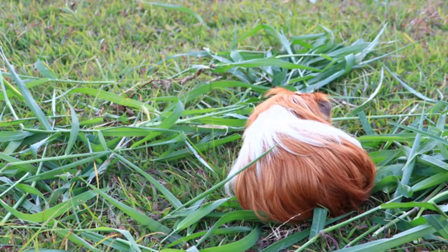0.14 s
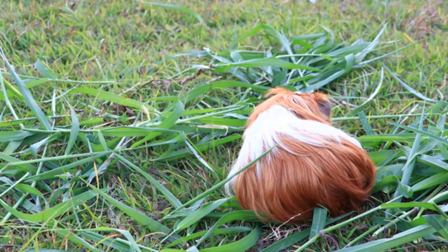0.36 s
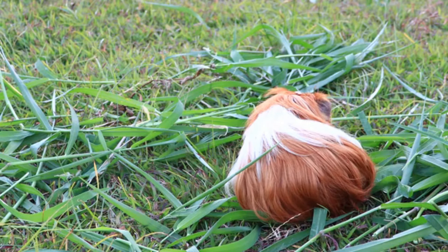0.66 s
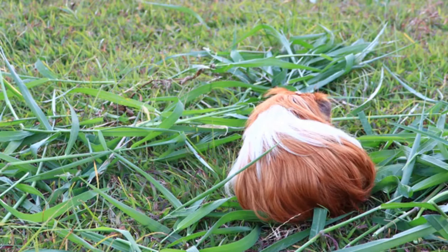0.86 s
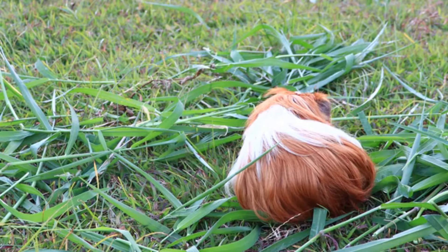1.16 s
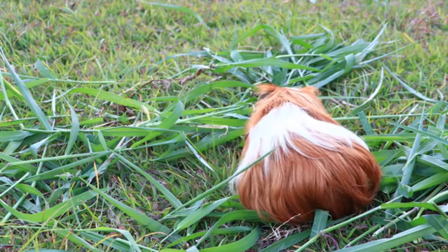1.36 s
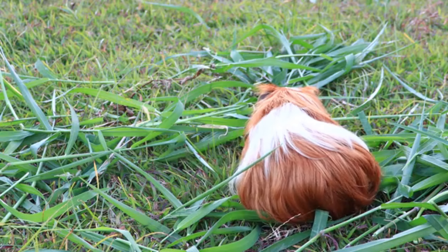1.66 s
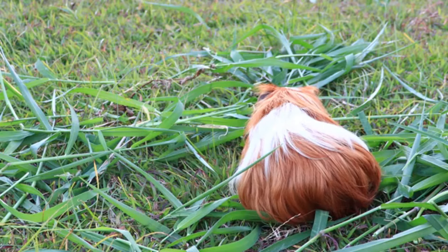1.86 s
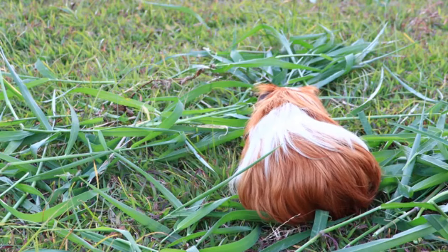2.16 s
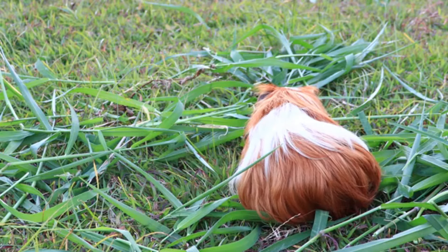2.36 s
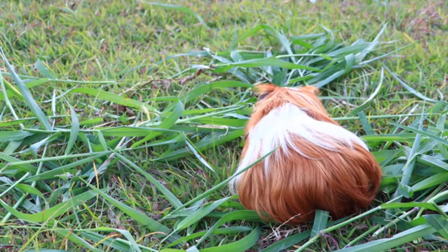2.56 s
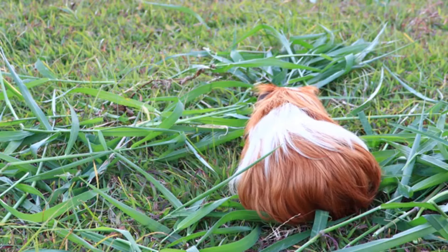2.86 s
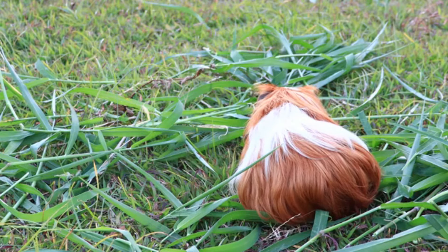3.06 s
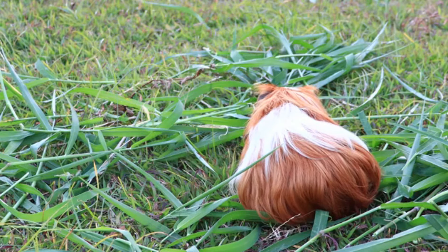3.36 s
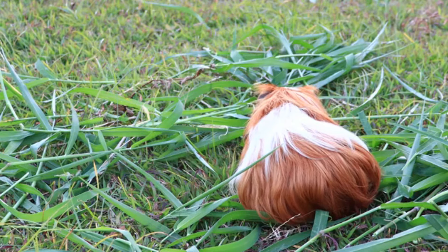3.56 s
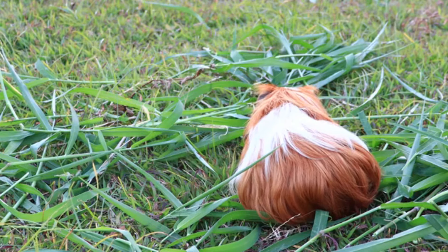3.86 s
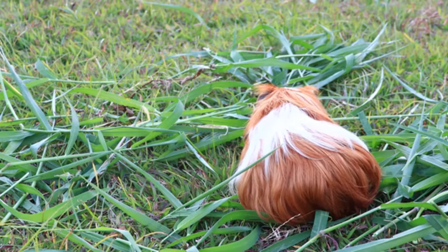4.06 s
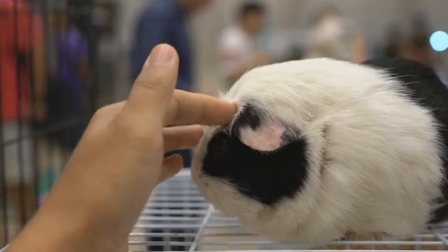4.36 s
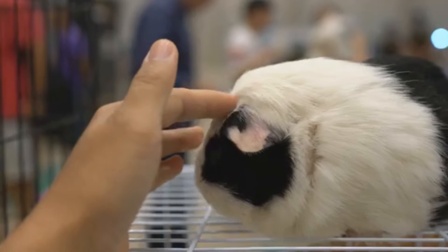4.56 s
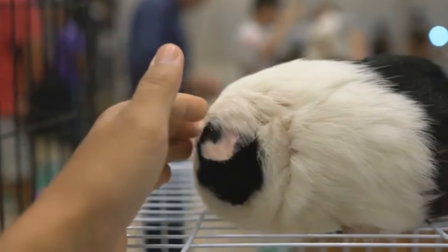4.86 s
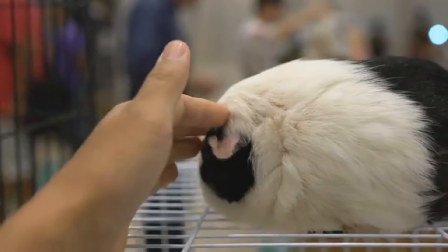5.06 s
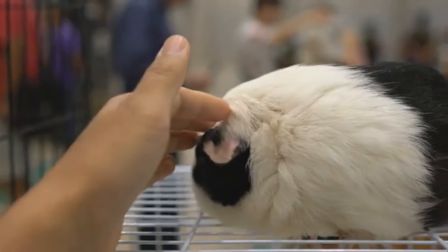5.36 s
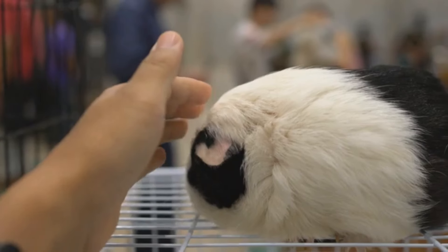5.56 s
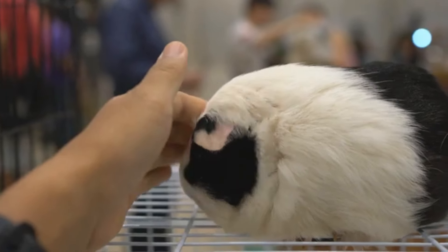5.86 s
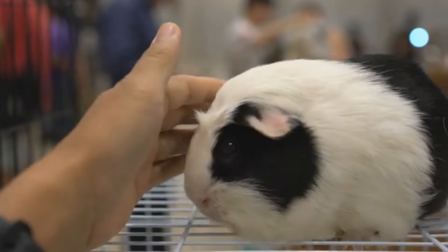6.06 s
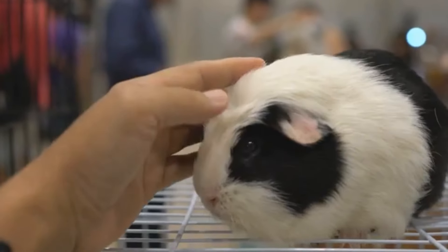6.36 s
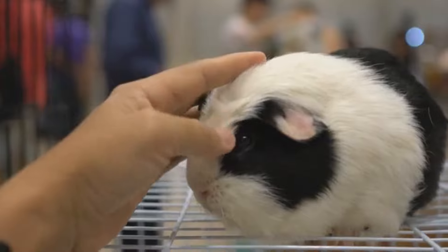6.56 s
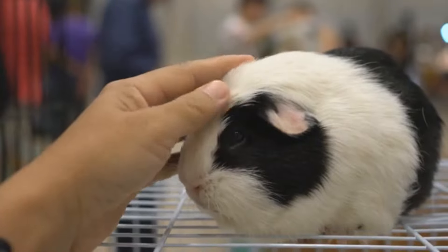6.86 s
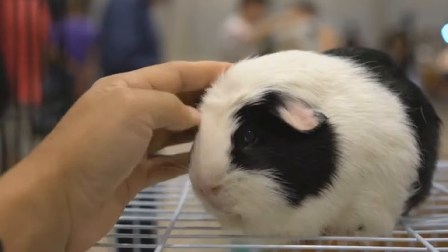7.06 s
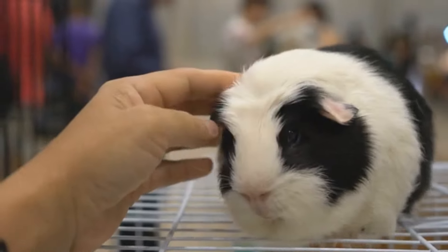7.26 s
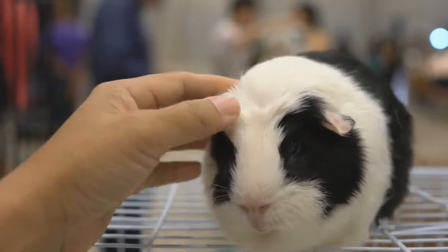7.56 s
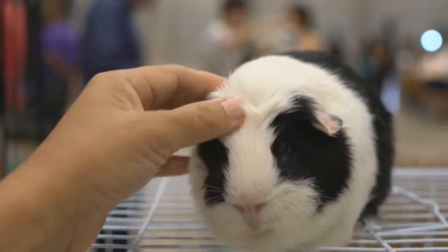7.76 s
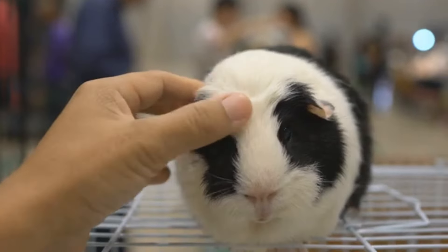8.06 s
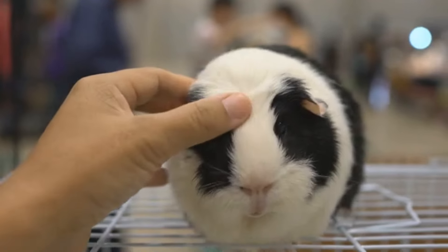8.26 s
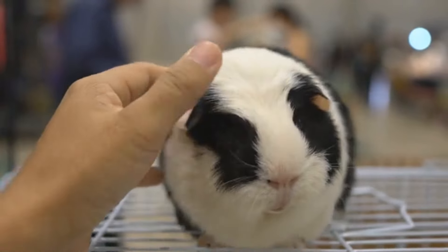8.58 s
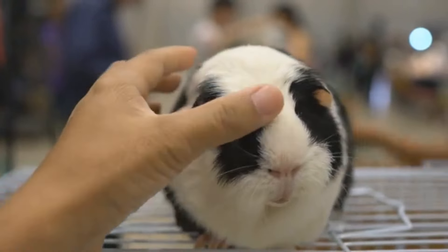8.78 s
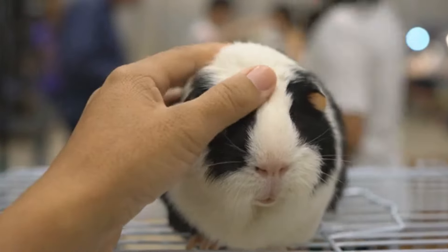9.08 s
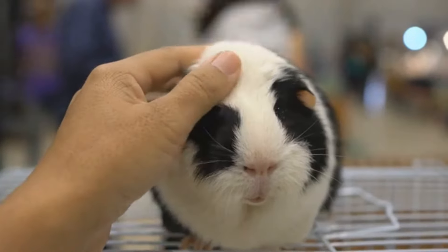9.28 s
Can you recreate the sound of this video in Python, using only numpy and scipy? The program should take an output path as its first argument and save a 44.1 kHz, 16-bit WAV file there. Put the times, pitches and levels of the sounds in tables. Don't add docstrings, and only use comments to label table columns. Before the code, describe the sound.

Piercing upward guinea pig wheeks, some overlapping and overloading, give way to soft coos, swooping whoops and dull little chirps over faint hiss.

```python
import sys
import numpy as np
from scipy import signal
from scipy.fft import rfft, irfft, next_fast_len
from scipy.io import wavfile
from scipy.ndimage import uniform_filter1d, minimum_filter1d, map_coordinates

SR = 44100
rng = np.random.default_rng(int(sys.argv[2]) if len(sys.argv) > 2 else 0)


def amplitude_ratio(level_db):
    exponent = np.asarray(level_db, float) / 20
    return 10 ** exponent


def store_pcm(level_fs):
    pcm = np.round(np.clip(level_fs, -1, 1) * 32767).astype(np.int16)
    wavfile.write(sys.argv[1], SR, np.atleast_2d(pcm).T)


N = 415422
TIME = np.arange(N) / SR

# pitch in Hz, then harmonics 1, 2 and 3 over the level in dB.
CALM = [(500, -5, -10, -13.5), (1000, -2.5, -4, -29.5), (1300, -3.5, -14, -8), (1800, 2.5, -31, -34.5),
        (2300, 3.5, -23, -40)]


def animal(calls, folds, tilt_db=9, jitter=0.011, shimmer_db=1.6056, air_db=-41):
    # frequency in Hz, density in dB per Hz.
    leak = [(600, -36), (1250, -16.5), (2400, -2.5), (3500, -6.5), (4200, 6), (4900, -11.5), (6800, -19.5),
            (8800, -5), (10000, -12.5)]
    sharpen = [0, 0.14, 0.7]
    voice, effort = np.zeros(N), np.zeros(N)
    order = np.arange(1, 14)[:, None]
    near = np.minimum(order, 3)
    for rows in map(np.array, calls):
        start, stop = int(rows[0, 0] * SR) + 1, min(int(rows[-1, 0] * SR), N)
        t = TIME[start:stop]
        push = rows[:, 2] - mouth_db(rows[:, 1])
        path = np.c_[rows[:, 0], np.log2(rows[:, 1]), push]
        octaves, push_db = (uniform_filter1d(c, size=300, mode="nearest") for c in curves(path, t))
        pitch = 2 ** octaves
        taut = np.clip((pitch - 600) / 800, 0, 1) * (push_db + 24.0)
        source_db = np.array([push_db + along(np.array(folds)[:, [0, k]], pitch) + sharpen[k - 1] * taut
                              for k in (1, 2, 3)])
        sag = (pitch[-1] > 3200) * np.clip(1 - (t[-1] - t) / 0.03, 0, 1) ** 2.2
        pitch = pitch * (1 - 0.11 * sag)
        slack = np.clip(900 / pitch, 0, 2)
        unsteady = 1 + jitter * wobble(250, len(t)) * (slack + 0.27)
        phase = 2 * np.pi * np.cumsum(pitch * unsteady) / SR
        edge = np.clip(np.minimum((t - t[0]) / 0.01, (t[-1] - t) / 0.007), 0, 1) ** 2

        level_db = source_db[near[:, 0] - 1] + mouth_db(order * pitch)
        level_db = level_db - (tilt_db + 9 * slack) * np.log2(order / near)
        level_db = level_db - 22 * sag * (near - 1)
        flutter = np.array([wobble(140, len(t)) for _ in order]) * np.minimum(order, 3.5)
        patches = np.array([wobble(30, len(t)) for _ in order])
        level_db = level_db + shimmer_db * flutter + (near - 1) * (slack < 0.7) * patches
        level = amplitude_ratio(level_db) * (order * pitch < SR / 3)
        partials = level * np.sin(order * phase + rng.uniform(0, 2 * np.pi, order.shape))
        voice[start:stop] += np.sqrt(2) * edge * partials.sum(0)
        effort[start:stop] += edge * np.sqrt(np.linalg.norm(level, axis=0)) * slack
    return voice + amplitude_ratio(air_db) * uniform_filter1d(effort, size=1300) * rush(leak, side_db=-99)[0]


def mouth_db(hz):
    # centre in Hz, width in Hz, gain in dB.
    resonances = [(1231, 180, 13.5), (2650, 1200, 6.5), (4260, 420, 0.5), (6590, 1500, 9.5),
                  (8300, 1300, -10.5), (10000, 2000, -8.5)]
    notch = 1 - 0.47 * np.exp(-((hz - 5020) / 240) ** 2)
    power = 0.026 + sum(amplitude_ratio(2 * db) / (1 + (2 * (hz - c) / w) ** 2) for c, w, db in resonances)
    return 10 * np.log10(power) + 20 * np.log10(notch + 1e-3)


def wheeks():
    # time in seconds, pitch in Hz, level in dB.
    long_calls = [
        [(0.34, 634.5, -61), (0.385, 946, -59), (0.402, 1400, -43), (0.424, 1767, -35), (0.478, 2260, -21),
         (0.492, 2360, -15.5), (0.54, 2818, -24), (0.592, 3285, -26.5), (0.686, 4100, -35.5),
         (0.735, 4390, -35.5)],
        [(0.633, 1214, -84), (0.695, 1796, -43), (0.765, 2155, -24.5), (0.8, 2474, -31.5), (0.845, 3080, -30.5),
         (0.929, 3462, -35.5), (0.97, 3390, -41.5)],
        [(1.192, 598, -51), (1.21, 800, -49), (1.223, 917, -48), (1.236, 1180, -32), (1.25, 1427, -28.5),
         (1.306, 1923, -14.5), (1.375, 2420, -16.5), (1.43, 3086, -22.5), (1.502, 3452, -26), (1.55, 3430, -30)],
        [(1.38, 636, -70.5), (1.468, 1523, -64), (1.548, 2390, -22), (1.588, 2616, -25), (1.626, 3160, -30),
         (1.712, 4025, -35.5), (1.762, 4260, -31)],
        [(3.584, 616, -48), (3.598, 800, -31), (3.612, 946, -36), (3.628, 1283, -19.5), (3.64, 1445, -20),
         (3.668, 1700, -16.5), (3.765, 2386, -13), (3.778, 2674, -14.5), (3.815, 3187, -22.5),
         (3.88, 3533, -27.5), (3.922, 3516, -31)],
    ]
    short_calls = [
        [(0.105, 592, -46), (0.135, 900, -42), (0.163, 1277, -30), (0.21, 1560, -29), (0.25, 1750, -18.5),
         (0.285, 1973, -16.5), (0.32, 2300, -16.5), (0.33, 2400, -24.5), (0.359, 2704, -33.5),
         (0.377, 2816, -24.5)],
        [(4.152, 618, -48.5), (4.18, 900, -47), (4.19, 1076, -42), (4.201, 1287, -29), (4.235, 1697, -22.5),
         (4.289, 2100, -14.5), (4.35, 2400, -22), (4.39, 2538, -33.5), (4.415, 2592, -43)],
    ]
    # pitch in Hz, then harmonics 1, 2 and 3 over the level in dB.
    tense = [(525, -23, -20, -11.5), (1050, -15, 0, -20.5), (1400, -4, -16, -9.5), (1930, 1.5, -24.5, -19),
             (2400, -1.5, -19, -26), (2700, -0.5, -19, -17.5), (2800, -0.3, -13.5, -17.5),
             (3330, -1, -10.5, -8), (3970, 0.5, -2.5, -70.5)]
    return animal(long_calls + short_calls, tense, tilt_db=6.5)


def shrieks():
    # time in seconds, pitch in Hz, level in dB.
    high_calls = [
        [(1.79, 1126, -64.5), (1.815, 1534, -53), (1.84, 1880, -29), (1.88, 2200, -30.5), (1.918, 2450, -47)],
        [(2.428, 2364, -26.5), (2.442, 2510, -12), (2.48, 3000, -12.5), (2.518, 3524, -19), (2.56, 3844, -25.5),
         (2.585, 4150, -24), (2.615, 4267, -24), (2.64, 4240, -27)],
        [(2.535, 1825, -57), (2.545, 2054, -43), (2.575, 2799, -55.5)],
        [(4.692, 2532, -20), (4.708, 3076, -12), (4.742, 3545, -16.5), (4.78, 3840, -17.5),
         (4.818, 4224, -18.5), (4.85, 4304, -22), (4.882, 4320, -25.5)],
    ]
    # pitch in Hz, then harmonics 1, 2 and 3 over the level in dB.
    shrill = [(1200, -8.5, 1.5, -19), (1917, -2.6, -22, -32), (2450, 1.64, -31, -15.5),
              (3000, 1.94, -21, -8.5), (3450, -2, -3, -12.5), (4050, 1.54, -4, -24.5)]
    return animal(high_calls, shrill)


def whoops():
    # time in seconds, pitch in Hz, level in dB.
    calm_calls = [
        [(6.875, 630, -47.5), (6.917, 559, -50.5), (6.965, 1050, -36.5), (6.981, 1289, -22.5),
         (7.005, 1522, -23.5), (7.017, 1675, -14.5), (7.035, 1763, -13.5), (7.155, 2244, -24),
         (7.18, 2300, -48)],
        [(7.564, 571, -38), (7.585, 684, -44), (7.6, 898, -40.5), (7.61, 1150, -29), (7.618, 1400, -25),
         (7.64, 1596, -21), (7.674, 1825, -15.5), (7.74, 2035, -26), (7.8, 2132, -34)],
        [(8.015, 647, -51.5), (8.051, 466, -49), (8.075, 655, -48.5), (8.09, 900, -41), (8.11, 1255, -28.5),
         (8.14, 1645, -27), (8.163, 1814, -41.5), (8.175, 1940, -40)],
    ]
    return animal(calm_calls, CALM, shimmer_db=2.5, air_db=-41)


def chirp(s, lead, rise, top_hz, db, lead_db, low_hz=480):
    def climb(at, share, gain_db):
        return s + lead + at * rise, low_hz + share * (top_hz - low_hz), db + gain_db

    return [(s, 634, db + lead_db), climb(0, 0, lead_db), climb(0.38, 0.34, -7.5),
            climb(0.65, 0.75, 0), climb(0.99, 1.0, -9.5)]


def chirps():
    # start in seconds, low lead-in in seconds, rise in seconds, top in Hz, peak in dB.
    small_calls = [(1.965, 0.0046, 0.1, 1800, -49.5), (2.156, 0.043, 0.11, 2300, -35.5),
                   (2.698, 0.064, 0.08, 2275, -49.5), (2.842, 0.0085, 0.099, 1630, -46.5),
                   (3.301, 0.0073, 0.13, 1756, -45.5), (4.454, 0.012, 0.092, 1770, -53.5),
                   (5.078, 0.01, 0.083, 1540, -49)]
    # pitch in Hz, then harmonics 1, 2 and 3 over the level in dB.
    hollow = [(500, -12, -13, -13.5), (1100, -5.5, -17, -17.5), (1478, 1, -17, -8.5), (2200, 3.8, -14, -17)]
    small = [(500, -22, -22.5, -14.5), (800, -16.5, -9.5, 2.5), (1100, -8.5, 14, -1.5),
             (1430, 0.5, -2, -28), (1899, -4.5, -9, -23), (2300, 5.1, -10.5, -16)]
    hooted = [chirp(*row, lead_db=-24.0) for row in small_calls if row[1] > 0.02]
    nasal = [chirp(*row, lead_db=-19.5) for row in small_calls if row[1] <= 0.02]
    return animal(hooted, hollow, tilt_db=1.5) + animal(nasal, small, tilt_db=10)


def grunts():
    # time in seconds, pitch in Hz, level in dB.
    low_notes = [
        [(1.146, 476.5, -54), (1.17, 423, -58), (1.19, 470, -55.5), (1.202, 560, -58)],
        [(3.54, 554.3, -52.5), (3.566, 420, -43), (3.584, 436, -39), (3.594, 500, -47)],
        [(4.106, 487, -62.5), (4.13, 420, -57), (4.15, 486, -56), (4.164, 500, -55)],
    ]
    calm_note = [(7.517, 450, -49), (7.545, 392, -41), (7.563, 467, -36), (7.575, 520, -49)]
    # pitch in Hz, then harmonics 1, 2 and 3 over the level in dB.
    slack_folds = [(420, -16.5, -20.5, -13), (560, -15, -18, -11.5)]
    return animal(low_notes, slack_folds, tilt_db=-4.5) + animal([calm_note], CALM, tilt_db=-1.5)


def asides():
    # time in seconds, pitch in Hz, level in dB.
    peeps = [
        [(2.975, 617, -60), (3.015, 440, -57), (3.045, 685, -54), (3.066, 1100, -47.5), (3.085, 1515, -30),
         (3.102, 1944, -41), (3.122, 2545, -30.5), (3.142, 2977, -20.5), (3.18, 3110, -35)],
        [(4.852, 370, -77), (4.9, 409, -75), (4.93, 690, -75), (4.96, 1200, -45), (5.0, 1610, -40),
         (5.03, 1996, -52)],
        [(5.185, 597, -66), (5.23, 460, -65.5), (5.27, 750, -60), (5.292, 1050, -52), (5.32, 1550, -43.5),
         (5.348, 1870, -54.5)],
    ]
    under_way = [(0.0, 570, -48.5), (0.022, 730, -50), (0.036, 1000, -42.5), (0.05, 1200, -30.5),
                 (0.068, 1520, -36.5), (0.11, 1800, -42.5), (0.132, 2020, -42), (0.146, 1980, -41)]
    leap = [(0.345, 646, -57), (0.386, 954, -51.5), (0.403, 1400, -43.5), (0.425, 1870, -48)]
    held = [(0.96, 782, -69), (0.985, 1150, -64), (1.01, 1290, -53), (1.094, 1306, -42),
            (1.12, 1400, -48.5), (1.19, 1360, -52.5)]
    fades = [
        [(4.40, 2600, -39.5), (4.46, 2743, -44), (4.51, 2850, -53)],
        [(7.16, 2400, -47.5), (7.22, 2800, -51), (7.29, 3056, -63)],
        [(0.962, 1742, -59), (0.985, 2300, -50.5), (1.005, 2650, -56.5)],
    ]
    # pitch in Hz, then harmonics 1, 2 and 3 over the level in dB.
    thin = [(450, -7.5, -12, -15), (800, -2.5, -11, -11), (1300, -5, -26, -18), (1900, -1.5, -14, -8),
            (3000, -1, -13.5, -26)]
    whine = [(560, -26.5, -21.5, 3.5), (1000, -9, 8.5, 2), (1550, -4.5, 4, -11), (1975, 8.5, -19.5, -15)]
    hummed = [(800, -17.5, 4.5, -26), (1300, -13, -5, -21.5)]
    pure = [(2492, -0.5, -41, -43), (2900, 1, -45, -45)]
    nasal = animal([under_way, leap], whine, tilt_db=13.5)
    steady = animal([held], hummed, air_db=-57.0)
    return animal(peeps, thin, tilt_db=11.5) + nasal + steady + animal(fades, pure, jitter=0.044)


def settled():
    # start in seconds, low lead-in in seconds, rise in seconds, top in Hz, peak in dB.
    soft_chirps = [(5.73, 0.00726, 0.07, 1300, -54)]
    last_chirps = [(8.396, 0.032, 0.068, 1453, -45.5), (8.668, 0.0078, 0.063, 1637, -52),
                   (8.77, 0.025, 0.069, 1673, -48.5), (9.036, 0.035, 0.066, 1940, -39),
                   (9.155, 0.0075, 0.048, 1345, -44.5), (9.371, 0.022, 0.099, 1300, -44)]
    # time in seconds, pitch in Hz, level in dB.
    coos = [
        [(5.51, 674, -65), (5.56, 429, -60.5), (5.59, 691, -58.5), (5.61, 1050, -38), (5.625, 1146, -59.5)],
        [(6.225, 693, -51), (6.262, 519, -46), (6.293, 722, -43), (6.31, 1130, -31.5), (6.322, 1300, -25),
         (6.35, 1284, -44), (6.41, 1300, -57.5), (6.46, 1270, -70.5)],
        [(6.56, 614, -49.5), (6.6, 500, -56), (6.622, 640, -50.5), (6.642, 912, -43.5), (6.667, 1200, -34.5),
         (6.69, 1266, -49.5)],
        [(6.64, 519, -53), (6.677, 667, -49.5), (6.705, 1140, -34.5), (6.724, 1457, -52.5)],
    ]
    # pitch in Hz, then harmonics 1, 2 and 3 over the level in dB.
    soft = [(505, 2, -19, -14), (900, 6, -7, -22), (1300, -1, 24.5, -29), (1800, -7.5, -16.5, -32.5)]
    dull = [(560, -2, -21, -21.5), (900, 5, -2, -14), (1300, -3.5, -9, -27), (1800, -5.5, -20, -28)]
    cooed = [(500, -4, -13, -9.5), (750, -3.5, -2, -16), (1000, -2, -11.5, -18), (1300, -2.5, -17, -23)]
    murmurs = [chirp(*row, lead_db=-17, low_hz=497) for row in soft_chirps]
    last = [chirp(*row, lead_db=-12.0, low_hz=583.0) for row in last_chirps]
    calls = animal(murmurs, soft, jitter=0.018, shimmer_db=1.2, air_db=-42)
    calls = calls + animal(last, dull, jitter=0.018, shimmer_db=1.2, air_db=-57.0)
    return amplitude_ratio(1.5) * (calls + animal(coos, cooed, tilt_db=10.5, jitter=0.012, shimmer_db=1.3, air_db=-40))


def rasp():
    # start in seconds, length in seconds, level in dB.
    puffs = [
        (9.085, 0.053, -52),
        (8.44, 0.029, -61),
        (0.029, 0.056, -44.5),
    ]
    shape = sum(amplitude_ratio(db) * np.sin(np.pi * np.clip((TIME - s) / length, 0, 1)) for s, length, db in puffs)
    return shape * rush([(500, -18), (1200, 6), (3000, -5), (4600, -6), (6500, -33), (9000, -40)], side_db=-7)


def room(x, side_db):
    # frequency in Hz, time to fall 60 dB in seconds.
    decay = [(500, 0.8), (2500, 0.32), (4200, 0.32), (6000, .3), (10000, 0.067)]
    hz, t, z = signal.stft(rng.standard_normal((2, SR // 2)), SR, nperseg=256)
    walls = amplitude_ratio(-60 * t / 0.15)
    beyond = amplitude_ratio(-12.5 - 60 * t / along(decay, hz)[:, None])
    tail = signal.istft(z * (walls + beyond), SR, nperseg=256)[1]
    late = np.pad(x, (90, 0))[None]
    mid, side = signal.fftconvolve(late, tail / np.linalg.norm(tail[0]), axes=1)[:, :N]
    return np.array([mid + amplitude_ratio(side_db) * side, mid - amplitude_ratio(side_db) * side])


def bedding():
    # start in seconds, length in seconds, crisp level in dB, dull level in dB.
    rustles = [
        (5.593, 0.018, -52.5, -58.5),
        (5.706, 0.022, -43, -63.5),
        (5.737, 0.2, -60.5, -70.5),
        (5.966, 0.049, -87.5, -52),
    ]
    # time in seconds, peak in dB, ring in Hz, crack share, attack in seconds.
    ticks = [
        (5.9517, -26, 2260, 0.25, 0.00015),
        (6.064, -40, 2150, 0.33, 0.000085),
        (8.271, -25.5, 1594, 0.02, 0.0023),
        (8.635, -38.5, 2780, 0.31, 0.000095),
        (9.2364, -49.5, 1270, 0.51, .0001),
    ]
    # time in seconds, peak in dB.
    bumps = [(5.97, -50)]
    shapes = [(TIME > s) * amplitude_ratio(-60 * np.clip(TIME - s - length, 0, None) / 0.15) for s, length, _, _ in rustles]
    crisp_gain, dull_gain = amplitude_ratio(np.array(rustles)[:, 2:].T) @ shapes
    grain = unit(amplitude_ratio(2.3 * wobble(450, N)))
    crisp = rush([(5500, -26.5), (7500, -6.5), (9200, 1.0), (10500, -7.0)], side_db=-13)
    dull = rush([(1200, -45.0), (1900, -8.5), (2400, -2.0), (3000, -18), (4500, -33.5)], side_db=-9.0)
    rustle = grain * (crisp_gain * crisp + amplitude_ratio(5.5) * dull_gain * dull)

    hits, t = np.zeros(N + SR), TIME[:SR // 4]
    for s, db, hz, share, attack in ticks:
        ring = amplitude_ratio(-60 * t / 0.011) * np.sin(2 * np.pi * hz * t)
        crack = share * amplitude_ratio(-60 * t / 0.019) * rng.standard_normal(len(t))
        hits[round(s * SR):][:len(t)] += amplitude_ratio(db) * (ring + crack) * np.minimum(t / attack, 1) ** 2
    for s, db in bumps:
        sway = np.sin(2 * np.pi * 42 * t + 4.0 * wobble(30, len(t)))
        hits[round(s * SR):][:len(t)] += amplitude_ratio(db - 60 * t / 0.46) * sway * np.minimum(t / 0.0064, 1)
    return rustle + hits[:N]


def drone():
    # start in seconds, length in seconds, centre in Hz, level in dB.
    rumbles = [
        (8.333, 0.51, 381.5, -64),
        (8.967, 0.25, 251.6, -62.5),
    ]
    total = 0
    for s, length, hz, db in rumbles:
        swell = np.sqrt(np.abs(np.sin(np.pi * np.clip((TIME - s) / length, 0, 1))))
        total = total + amplitude_ratio(db) * swell * rush([(0.66 * hz, -40), (hz, 0), (1.62 * hz, -40)], side_db=-11.0)
    return total


def background(voices):
    # frequency in Hz, density in dB per Hz.
    hiss_bands = [(1060, -36.5), (1800, -12), (2800, -4), (4800, -11.5), (6800, -13), (8930, -13.5),
                  (10200, -16), (10500, -44), (13600, -62), (22000, -120)]
    tone_bands = [(35, -99), (60, -39), (108, -15), (199, -15.5), (404, -8), (489, -11), (1010, -7.5),
                  (1840, -12), (2330, -27.5), (2600, -24.5), (3380, -56), (5720, -120)]
    air_bands = [(710, -57.5), (1200, -39.5), (2410, 3), (3600, -11.5), (4200, -10), (4940, -23.5),
                 (5720, -5), (6430, -14), (9680, -12.5), (10200, -24.5), (10500, -46.5), (13600, -89),
                 (22000, -120)]
    # time in seconds, level in dB.
    gate = [(0, -115), (2.2, -105), (3.5, -72), (4.1, -100), (5.5, -74), (5.7, -67), (6.0, -69),
            (6.5, -65.5), (7.3, -74.5), (8.2, -67), (8.65, -66), (9.0, -66.5), (9.42, -66.5)]
    # start in seconds, length in seconds, first and last level in dB.
    pants = [(2.383, 0.08, -83.5, -44), (3.122, 0.25, -65, -68), (4.412, 0.19, -74.5, -71),
             (4.889, 0.14, -78.5, -77.5), (8.18, 0.14, -92, -99), (8.39, 0.075, -86, -87.5),
             (2.669, 0.16, -89, -69), (4.656, .05, -91, -65.5), (7.188, 0.15, -67.5, -65),
             (7.343, 0.091, -69.5, -84), (9.089, 0.053, -91, -89)]
    # start in seconds, length in seconds, gain in dB.
    gate_moves = [(0.84, 0.16, -5), (2.2, 0.166, 0), (4.56, 0.012, -6), (4.42, .26, -1.5), (7.329, 0.016, -12),
                  (5.6, 0.122, -3.5), (6.6, 1.2, -2.5), (1.9, 0.227, -7.5), (4, 0.23, 2.5), (0.99, 0.17, -4)]
    quiet_db = -48
    power = np.abs(uniform_filter1d(voices ** 2, round(0.16 * SR)))
    loud_db = 10 * np.log10(power + amplitude_ratio(2 * quiet_db))
    hiss_db = -58.5 + 0.38 * (loud_db + 26.5) + 1.2 * wobble(4.5, N)
    hiss = amplitude_ratio(hiss_db) * rush(hiss_bands, side_db=-12.0)
    tone_db = curves(gate, TIME)[0] - 0.063 * (loud_db - quiet_db) + 6 + 1.5 * wobble(9, N)
    tone = amplitude_ratio(tone_db) * rush(tone_bands, side_db=-11)
    breaths = sum(amplitude_ratio(curves([(s, first_db), (s + length, last_db)], TIME)[0] + 18.5)
                  for s, length, first_db, last_db in pants)
    pant = uniform_filter1d(breaths, size=1500) * rush(air_bands, side_db=-11.5)
    return np.prod([dip(*row) for row in gate_moves], axis=0) * (hiss + pant) + tone


def hum():
    beat = np.clip((TIME - 5.55) / 0.21, 0, 1) * np.cos(np.pi * 1.81 * (TIME - 6.93))
    return np.sqrt(2) * amplitude_ratio(-75.5 + wobble(2.0, N)) * beat * np.sin(2 * np.pi * 119 * TIME)


def unit(x):
    return x / np.sqrt(np.mean(x ** 2) + 1e-20)


def along(points, hz):
    f, v = np.transpose(points)
    return np.interp(np.log(hz + 1), np.log(f + 1), v)


def curves(rows, t):
    s, *cols = np.transpose(rows)
    return [np.interp(t, s, c, -120, -120) for c in cols]


def wobble(rate, size):
    knots = rng.standard_normal(int(size * rate / SR) + 4)
    return map_coordinates(knots, [np.arange(size) * rate / SR])


def filtered(x, response):
    m = next_fast_len(N + 8192)
    return irfft(rfft(x, m) * response(np.fft.rfftfreq(m, 1 / SR)), m)[..., :N]


def rush(spectrum, side_db):
    mid, side = filtered(rng.standard_normal((2, N)), lambda hz: amplitude_ratio(along(spectrum, hz)))
    return unit(np.array([mid + amplitude_ratio(side_db) * side, mid - amplitude_ratio(side_db) * side]))


def dip(s, length, db):
    return uniform_filter1d(amplitude_ratio(db * ((TIME > s) & (TIME < s + length))), size=200)


def squash(x, top, knee):
    drive = 0.85 * x.mean(0) + 0.15 * x
    return x / (1 + np.abs(drive / top) ** knee) ** (1 / knee)


def masked(x, depth_db, far_db):
    z = signal.stft(x, nperseg=512)[2]
    power = uniform_filter1d((np.abs(z) ** 2).mean(0), size=5, axis=0)
    band = np.sqrt(np.abs(uniform_filter1d(power, size=3, axis=1)))
    masker = -minimum_filter1d(-band, size=31, axis=0, origin=11)
    masker = np.maximum(masker, amplitude_ratio(-far_db) * band.max(axis=0))
    keep = 1 / (1 + (amplitude_ratio(-depth_db) * masker / (band + 1e-12)) ** 8)
    keep[:6] = 1
    return signal.istft(z * keep, nperseg=512)[1][:, :N]


def scene():
    # start in seconds, length in seconds, gain in dB.
    splice = (8.176, .25, -10)
    cut = dip(*splice)
    pigs = amplitude_ratio(4.5) * cut * (wheeks() + shrieks() + whoops() + chirps() + grunts() + asides())
    murmurs = settled()
    wet = amplitude_ratio(-9.0) * cut * room(pigs, side_db=-5.0) + amplitude_ratio(-5) * room(murmurs, side_db=-6)
    return pigs + murmurs + wet + rasp() + bedding() + drone() + background(pigs + murmurs)


def band_limit(x):
    return signal.sosfilt(signal.butter(12, 15910, fs=SR, output="sos"), x)


def record(dry):
    # start in seconds, length in seconds, level in dB.
    overloads = [
        (1.29, 0.067, -3),
        (2.43, 0.17, 6),
        (3.66, 0.16, -1.5),
        (4.27, 0.037, -1),
        (4.69, .15, 4.5),
    ]
    narrow = filtered(dry, lambda hz: 1 / (1 + (hz / 10300) ** 40))
    grit = 1 + 0.04 * rng.standard_normal(N)
    products = (squash(narrow, top=0.38, knee=5.5) - narrow) * grit
    bent = narrow + filtered(products, lambda hz: 1 / (1 + (900 / (hz + 1)) ** 8))
    turned = filtered(bent, lambda hz: (1300 - 1j * hz) / (1300 + 1j * hz))
    hot = squash(turned, top=0.44, knee=10)
    rumble = filtered(hot - turned, lambda hz: 1 / (1 + (hz / 800) ** 8))
    thud = amplitude_ratio(-22.5) * filtered(np.abs(hot - turned).mean(0), lambda hz: 1 / (1 + (hz / 100) ** 4))
    passed = sum(amplitude_ratio(db) * ((TIME > s) & (TIME < s + length)) for s, length, db in overloads)
    passed = uniform_filter1d(passed, size=400)
    hot = hot - rumble + passed * (0.7 * rumble.mean(0) + 0.35 * rumble + thud)
    coupled = filtered(hot, lambda hz: 1j * hz / (94 + 1j * hz) / (1 + (hz / 15600) ** 150))
    return band_limit(masked(coupled, depth_db=39, far_db=24.5) + hum())


dry = scene()
out = record(dry)
store_pcm(out)
```